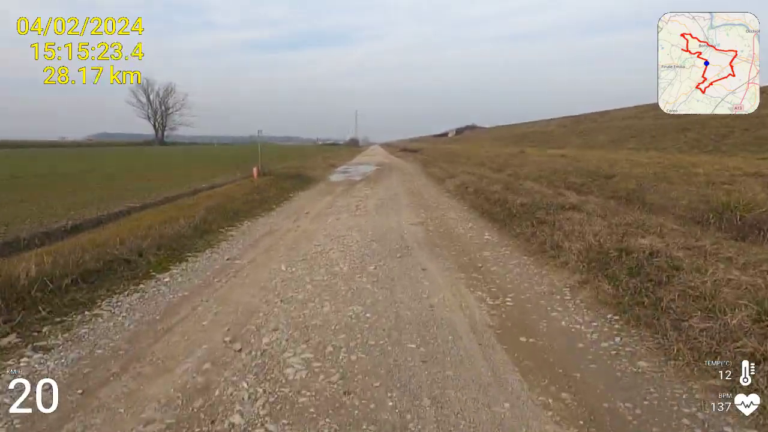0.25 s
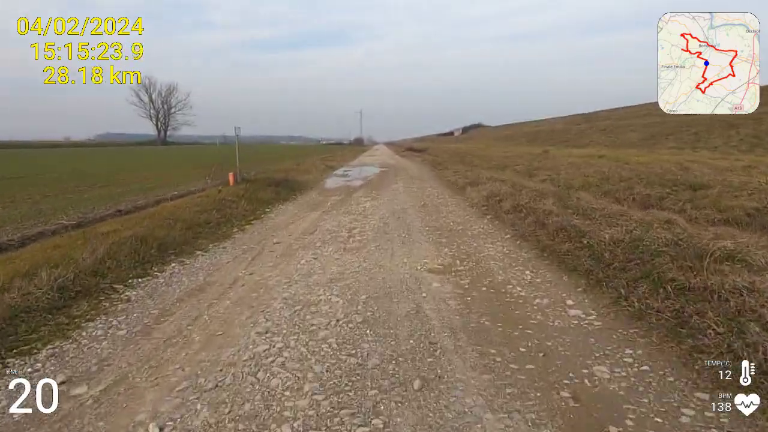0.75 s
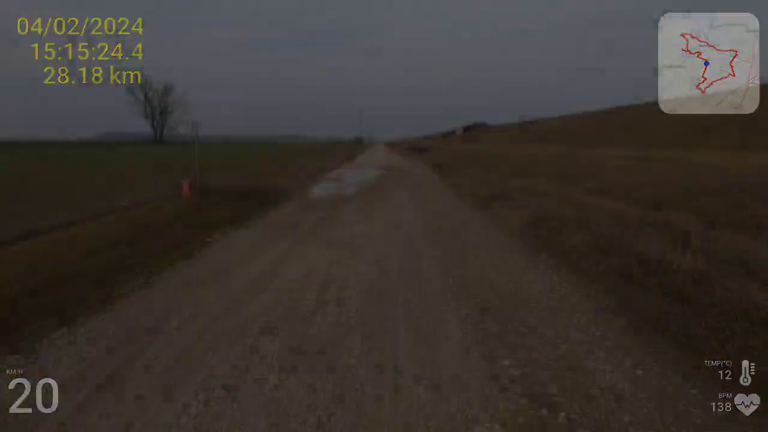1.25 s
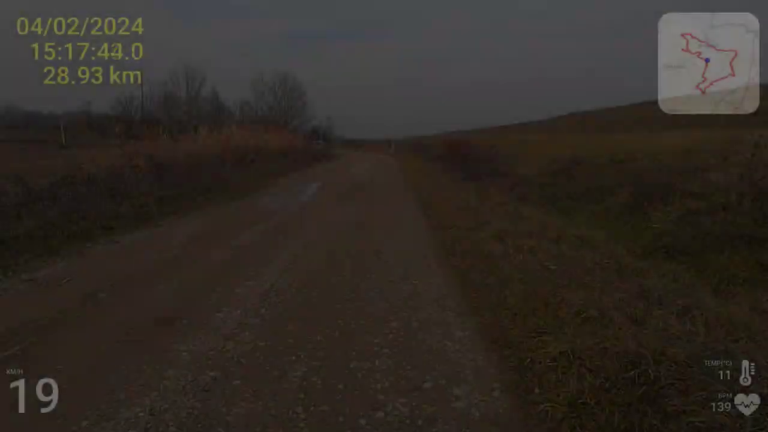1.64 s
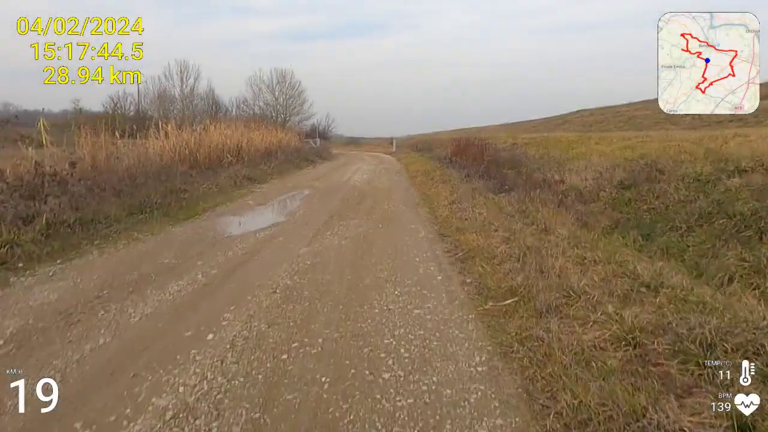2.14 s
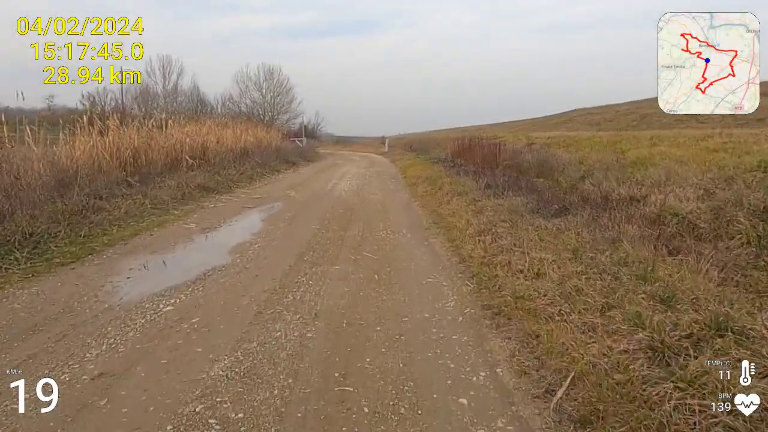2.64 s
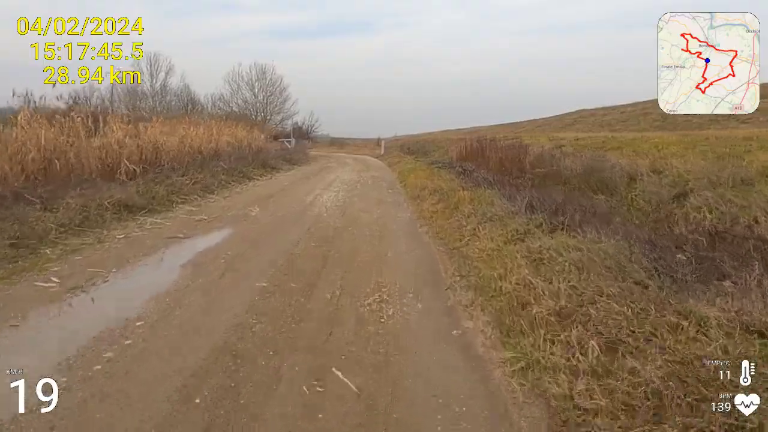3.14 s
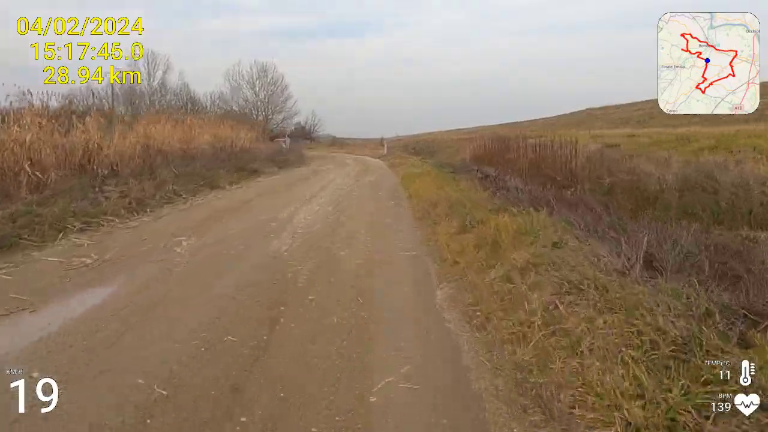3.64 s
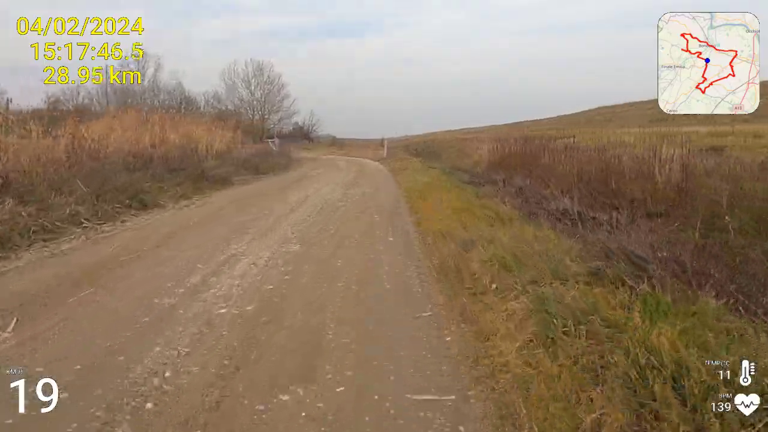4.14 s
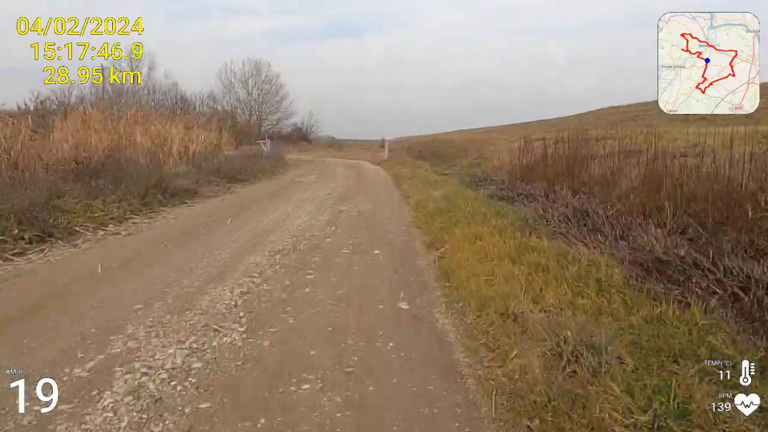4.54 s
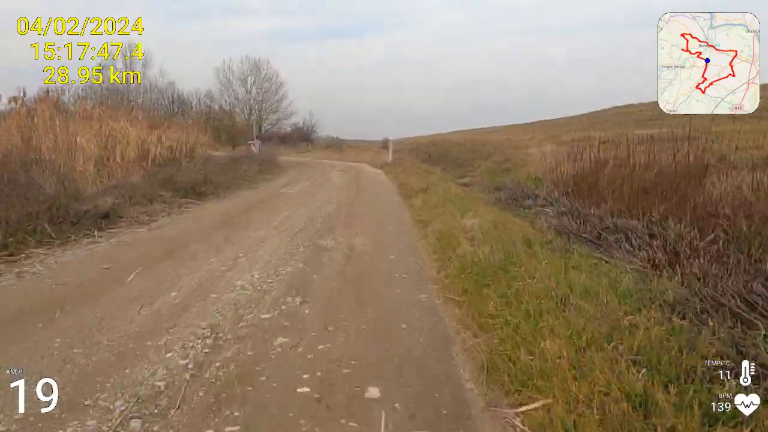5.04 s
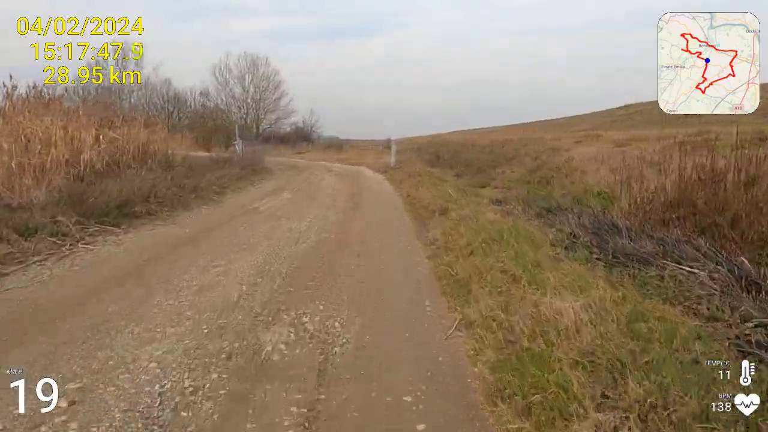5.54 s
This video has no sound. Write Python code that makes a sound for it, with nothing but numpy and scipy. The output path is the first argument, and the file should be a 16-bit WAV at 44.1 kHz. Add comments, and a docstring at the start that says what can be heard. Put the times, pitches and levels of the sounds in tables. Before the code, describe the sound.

A bicycle rolls over loose gravel, heard close from a camera riding on it, outdoors without echo. From 0 to 0.55 s, rapid jolts come around forty a second: hard rattling clatter, hollow mid-pitched stone knocks and dull frame thumps. They weaken until 0.75 s, leaving softer crunch and gritty crackle. Another rattling burst comes at 1.3-1.5 s, with one thin snap at 1.5 s, then more at 1.85-2.07 and 2.2-2.46 s. Short clatters follow at 2.8, 3.4-3.5 and 4.2 s, with calmer rolling between. The crunch thickens again around 5.05-5.4 s, with scattered stone knocks and a weak jolt near 5.25 s. Random pebble ticks and small dull bumps continue throughout. Low wind rumble fluctuates on the microphone, swelling with the shaking and dipping briefly, easing near the end. Faint high metallic pings sound at about 5.0, 5.13 and 5.4 s.

```python
"""Quick jolts rattle a bicycle on rough gravel while single stones knock, heard from a camera riding on it.
Tyres crunch throughout as random clicks and ringing pebbles; smoother ground parts the rough patches.
Jolts swell filtered noise into frame thumps and pebble clatter into rattle; small bumps thud in the frame.
Wind rumbles on the microphone as low noise in two bands; one thin snap comes early,
and late on a loose metal part, a tapped resonator, pings faintly."""
import sys
import numpy as np
from scipy import signal
from scipy.fft import rfft, irfft
from scipy.io import wavfile
from scipy.ndimage import uniform_filter1d

SR = 44100
rng = np.random.default_rng(int(sys.argv[2]) if len(sys.argv) > 2 else 0)


def to_wav(sig):
    """Store sig (one row per channel, or 1-D mono) as 16-bit WAV at the path in sys.argv[1].

    Samples outside -1..1 are clipped; the rate is SR.
    """
    pcm = np.clip(np.atleast_2d(sig), -1, 1) * 32767
    pcm = np.round(pcm).astype(np.int16)
    wavfile.write(sys.argv[1], SR, pcm.T)  # frames by channels


N = 254898
TIME = np.arange(N) / SR  # seconds

# The jolts of the rough patches, levels before the trim of each layer:
# start_s [centre of the swell, s], rattle_db [dB], spread_s [sigma of the swell, s],
# then relative to the rattle: knock_db [dB], treble_db [dB], thump_db [dB]
JOLTS = [(0.045, -29.5, 0.0052, 4.5, -9.5, 10), (0.062, -25, 0.0079, -2, -20, 3.5),
         (0.092, -27.5, 0.0068, 1, -17.5, -1), (0.11, -27.5, 0.0064, 5, -24, 5),
         (0.137, -28.5, 0.0055, 4, -17, 6), (0.157, -25, 0.0043, -6, -22, 5.5),
         (0.183, -26.5, 0.0061, 0, -18, 8), (0.201, -27, 0.0055, 3, -15.5, 6),
         (0.222, -24, 0.0041, -2, -17.5, 0.5), (0.239, -31, 0.0066, 0, -17, 7),
         (0.265, -26, 0.0039, -1, -13, 7), (0.286, -25, 0.005, -2, -20, 2),
         (0.314, -29, 0.0057, 2, -19, -6), (0.332, -26, 0.0046, 1, -21, 8),
         (0.354, -27.5, 0.004, 3, -25, 11), (0.368, -28.5, 0.0028, -3, -29, 9),
         (0.398, -27, 0.0044, 1, -17, 6), (0.416, -25.5, 0.0057, 1, -15, 5.5),
         (0.443, -26.5, 0.0052, -1, -15, 6), (0.466, -27, 0.0045, 2, -19, 7),
         (0.49, -30.5, 0.0052, 3, -14, 10), (0.515, -25.5, 0.0048, -3, -19, 6.5),
         (0.541, -27, 0.007, -5, -20.5, 5.5), (0.608, -37, 0.0082, 6.5, -19, 11.5),
         (0.653, -32.0, 0.0077, 2.5, -20, 7), (0.696, -34.5, 0.004, 5, -15, 10),
         (0.755, -34, 0.0096, 2, -21, 12), (1.287, -30.5, 0.007, 1.5, -23, 5),
         (1.307, -38, 0.0082, 4, -16, 13), (1.33, -26.5, 0.0065, 2, -12.5, 5),
         (1.356, -25.5, 0.0056, 5.5, -20, 3), (1.378, -29, 0.0058, 3, -30, 6),
         (1.392, -23.5, 0.0045, -6, -21, 0), (1.406, -26.5, 0.0053, -1, -24, 4.5),
         (1.434, -31, 0.0077, 0, -24, 10.5), (1.455, -43, 0.0083, 4, -18, 16),
         (1.474, -37.5, 0.0077, 2, -16, 7), (1.496, -41.5, 0.007, 7, -12, 12),
         (1.864, -27.9, 0.0042, -3, -14, 7), (1.89, -28, 0.0063, 2, -15, 8),
         (1.908, -27.5, 0.004, 2.5, -15, 3), (1.931, -28, 0.0042, 0, -17, 1),
         (1.953, -27.5, 0.0049, -1, -24, 0), (1.98, -28.5, 0.0055, 4.5, -17, 7),
         (2.002, -25.9, 0.0056, -2, -19, 0), (2.025, -30.5, 0.0053, 4.5, -16, 5.5),
         (2.042, -34, 0.0049, 4, -18, 4), (2.066, -29.5, 0.004, 1, -15, -1),
         (2.217, -30.5, 0.0046, 5.5, -15, 13.5), (2.236, -28.5, 0.0054, 2, -18, 8),
         (2.287, -35.9, 0.0053, 5, -20, 17), (2.31, -27, 0.0064, -1, -17.5, 10.5),
         (2.327, -29.5, 0.0047, -3, -27, 5), (2.352, -28.7, 0.0051, 3, -16, 4),
         (2.379, -26.6, 0.0061, 2, -20, 11), (2.405, -26, 0.0052, 3, -15.5, 10.5),
         (2.433, -28, 0.0037, 1, -18, 8), (2.457, -26, 0.0064, 0.5, -17.5, 6.5),
         (2.796, -28.5, 0.0042, -2, -14, 9.5), (2.812, -32.6, 0.0062, -5, -17, 13),
         (2.827, -29.5, 0.0086, -0.5, -19, 10.5), (3.378, -31, 0.0052, 0, -16.5, 12),
         (3.391, -34, 0.0044, 8.5, -18, 1), (3.403, -26, 0.0049, 3.5, -19, 8),
         (3.414, -24.7, 0.003, 0, -19, -12), (3.427, -28.5, 0.0049, -3, -19, 7),
         (3.45, -28, 0.0042, 3, -15, 6), (3.467, -34.5, 0.0064, 2, -22, 14),
         (3.525, -39, 0.0094, 2, -18, 17), (4.185, -33.5, 0.0064, 2, -21, 3),
         (4.197, -28, 0.0059, 1, -11.5, 6), (4.218, -26.4, 0.006, 1, -11.5, 8),
         (4.229, -32, 0.0048, 1, -22, -4), (4.242, -41, 0.0068, -6, -23, 16),
         (4.257, -32, 0.0033, 3, -16, 1), (4.272, -36.5, 0.0056, 7, -24, 12),
         (5.245, -39.8, 0.0047, 7.5, -15, 16), (5.267, -34.5, 0.0042, -4, -20, 9.5)]
# What the shaken bike rings with: pitch_hz [Hz], level_db [relative dB per Hz]
BODY = [(130, 2.5), (260, 8.5), (520, 3), (950, 0), (1350, 1.5), (1750, -4.5), (2100, -2), (2520, -2.5),
        (2800, -8.5), (3750, -9), (4400, -19), (8000, -26), (9300, -42.5), (12000, -51.5), (13500, -72),
        (16000, -89.5)]
TREBLE_BAND_HZ = (4200, 15000)


def tyres(gravel_db, grit_db):
    """Stones grind under the tread in clumps; fine grit crackles along with them and now and then spits."""
    # Tyre on coarse gravel: pitch_hz [Hz], level_db [relative dB per Hz]
    gravel_spectrum = [(150, -0.5), (350, 10.5), (650, 5.5), (1000, -0.5), (1400, 3.5), (1800, -2),
                       (2150, -0.5), (2550, -7), (3100, -33), (5000, -43.5)]
    # Tyre on fine grit: pitch_hz [Hz], level_db [relative dB per Hz]
    grit_spectrum = [(1500, -18.5), (2400, 0), (2900, 1.5), (3800, -1), (4700, -8), (5300, -12),
                     (7000, -16), (8200, -17), (9000, -30.5), (12500, -62), (16000, -89.5)]
    # Gain of the grit's treble: start_s [s], gain_db [dB]
    grit_treble = [(0, -6.5), (3.6, -0.5), (4.4, 3.5), (5.1, 5), (5.78, 4)]
    # Spits of sand flung off the tread: start_s [centre, s], level_db [dB]
    sand_spits = [(0.782, -50), (1.074, -46.5), (1.168, -42.5), (1.816, -40), (2.126, -38), (2.581, -46),
                  (2.727, -44.5), (2.887, -45)]
    spit_spread_s = 0.0098

    clumps = drift(rate=110)
    gravel_pebbles = pebbles(per_s=4500, spread_db=4.0, cycles=6.2, ring_db=-3.0)
    gravel = colour(gravel_pebbles, gravel_spectrum) * from_db(2.0 * clumps)
    grit_pebbles = pebbles(per_s=1700, spread_db=-0.5, cycles=7.5, ring_db=-6.5)
    grit = colour(grit_pebbles, grit_spectrum) * from_db(1.7 * clumps)

    treble_db, = in_time(grit_treble)
    highpass = signal.butter(2, 4800, "high", fs=SR, output="sos")
    grit = grit + (from_db(treble_db) - 1) * signal.sosfiltfilt(highpass, grit)

    spits = sum(from_db(db) * np.exp(-.5 * ((TIME - s) / spit_spread_s) ** 2) for s, db in sand_spits)
    gravel_gain = from_db(gravel_db + 3.0 + 1.4 * drift(rate=9))
    grit_gain = np.hypot(from_db(grit_db - 0.1), spits)
    return evened(gravel, even_s=0.071) * gravel_gain + evened(grit, even_s=0.24) * grit_gain


def bike():
    """Every jolt thumps the frame and lets loose parts knock, rattle and click, each in its own measure."""
    # The frame's thump: pitch_hz [Hz], level_db [relative dB per Hz]
    frame = [(50, -27.5), (100, -9.5), (150, 7), (240, 5), (380, -3.5), (560, -15), (1000, -61.5),
             (5000, -110)]
    _, rattle_db, _, knock_db, treble_db, thump_db = np.transpose(JOLTS)

    # colour_db lets the mix of pebble pitches wander from jolt to jolt
    clatter = pebbles(per_s=900, spread_db=2.0, cycles=8.0, ring_db=-2.0, colour_db=2.5)
    chatter = bent(colour(clatter, BODY))
    thump = evened(colour(rng.standard_normal(N), frame), even_s=0.011)
    out = from_db(-0.1) * jolt_force(rattle_db + thump_db) * thump

    layers = (((420, 1450), knock_db - 0.9),  # knock
              ((1450, 4200), -0.4),  # rattle
              (TREBLE_BAND_HZ, treble_db + 0.2))
    for band_hz, over_db in layers:
        bandpass = signal.butter(4, band_hz, "band", fs=SR, output="sos")
        part = signal.sosfiltfilt(bandpass, chatter)
        out = out + jolt_force(rattle_db + over_db) * evened(part, even_s=0.0083)
    return out


def jolt_force(levels_db):
    """Each jolt is a short swell of force; swells that overlap add in power."""
    reach_s = 1 / 43  # how far each side of its centre a swell is drawn
    force = np.zeros(N)
    for (s, _, spread_s, *_), db in zip(JOLTS, levels_db):
        near = slice(max(int((s - reach_s) * SR), 0), int((s + reach_s) * SR))
        swell = from_db(db) * np.exp(-.5 * ((TIME[near] - s) / spread_s) ** 2)
        force[near] = np.hypot(force[near], swell)
    return force


def stones(rows, settle_s, scatter_db, settle_clicks_per_s, ring_db, cycles):
    """A stone clicks hard, then settles in small clicks; it rings at its own pitch through the bike."""
    # What a stone rings with: multiple [times its pitch], level_db [dB]
    stone_modes = [(1, 2.5), (1.62, -16)]
    level_s = 0.0059  # time over which a stone's level is reckoned
    contact_hz, contact_follows = 13000, .5  # treble limit for a 1 kHz stone; power of pitch it follows

    out = np.zeros(N)
    age = np.arange(SR // 40) / SR
    click = 1. * (age == 0)
    fade = np.cos(np.pi / 2 * age / age[-1]) ** 2
    body = bent(colour(click, BODY)[:len(age)])
    treble = signal.butter(4, TREBLE_BAND_HZ[0], "high", fs=SR, output="sos")
    for s, db, hz, hard_db in rows:
        settling = rng.standard_normal(len(age)) * (rng.random(len(age)) < settle_clicks_per_s / SR)
        settling = settling * np.exp(-age / settle_s)
        contacts = click + from_db(scatter_db) * settling / (np.linalg.norm(settling) + 1e-9)

        # a big, low-pitched stone makes a longer, duller contact
        soft = np.exp(-2 * np.pi * contact_hz * (hz / 1000) ** contact_follows / SR)
        dulled = signal.lfilter([1 - soft], [1, -soft], contacts)
        rings = sum(from_db(mode_db) * ring(contacts, hz * multiple, cycles)
                    for multiple, mode_db in stone_modes)
        knock = signal.fftconvolve(dulled + from_db(ring_db) * rings, body)[:len(age)] * fade

        # a hard stone has more treble
        knock = knock + (from_db(hard_db) - 1) * signal.sosfiltfilt(treble, knock, padtype="constant")
        gain = from_db(db) * np.sqrt(level_s * SR / np.sum(knock ** 2))
        at = round(s * SR)
        out[at:at + len(age)] += gain * knock * rng.choice([-1, 1])
    return out


def small_stones(gravel_db):
    """Strays strike at random, about as hard as the gravel level: start_s, level_db, pitch_hz, treble_db."""
    per_s, spread_db, treble_db = 18, 3.5, 3
    low_hz, high_hz = 910, 2240
    rows = []
    for when, force, size in rng.random((round(per_s * N / SR), 3)):
        at = int(when * (N - SR // 30))
        db = gravel_db[at] + spread_db * (2 * force - 1)
        pitch_hz = high_hz * (low_hz / high_hz) ** size
        rows.append((at / SR, db, pitch_hz, treble_db))
    return rows


def bumps():
    """Small bumps come at uneven moments, each a dull thud in the frame."""
    # Thud in the frame: pitch_hz [Hz], level_db [relative dB per Hz]
    thud = [(50, -12.5), (105, 5), (150, -4), (215, -3), (300, -10.5), (400, -17), (580, -16.5), (800, -29),
            (1200, -58), (6000, -120)]
    return from_db(-32) * colour(grains(per_s=17, spread_db=-1.5), thud)


def snap():
    """A single thin click at 1.507 s, bright because a high-pass thins its lows."""
    click = from_db(-27) * (np.arange(N) == round(1.507 * SR))
    return signal.lfilter(*signal.butter(1, 3500, "high", fs=SR), click + 1e-18)


def pings():
    """A small loose metal part is tapped and rings on at one pitch."""
    # Taps on the part: start_s [s], level_db [dB]
    metal_taps = [(4.988, -38), (5.132, -41), (5.396, -45)]
    taps = np.zeros(N)
    for s, db in metal_taps:
        taps[round(s * SR)] = from_db(db)
    return ring(taps, hz=2480, cycles=170)


def wind(shaking):
    """Large eddies at the port rumble deep, small ones higher; gusts and the swaying camera raise both."""
    # Air on the microphone: start_s [s], deep_db [deep rumble, dB], upper_db [upper rumble, dB]
    gusts = [(0, -29, -17.5), (0.1, -18, -20.5), (0.43, -21.5, -24), (0.57, -23, -22.5), (0.72, -22, -21),
             (0.86, -22.5, -30), (1.12, -22.5, -28), (1.33, -21, -21.5), (1.56, -23, -27),
             (1.75, -20.5, -25), (1.92, -19.5, -23.5), (2.1, -24, -25.5), (2.38, -20, -23),
             (2.5, -23, -23.5), (2.78, -22, -26), (2.95, -22.5, -26.5), (3.1, -21.5, -27),
             (3.3, -20.5, -25), (3.48, -23.5, -20.5), (3.63, -19.5, -25.5), (3.8, -21, -26.5),
             (4.0, -22.5, -26.5), (4.14, -20, -23), (4.4, -22, -23.5), (4.53, -19, -26), (4.72, -21, -23),
             (4.86, -21, -23.5), (5.1, -22.5, -22), (5.3, -20, -23.5), (5.47, -20, -28.5), (5.58, -28, -29),
             (5.78, -24.5, -24)]
    # Moments when the wind drops briefly: start_s [centre, s]
    lulls = [0.0, 0.575, 0.81, 2.5, 2.87, 3.8, 4.43, 4.659, 4.97]
    # Wind on the microphone: pitch_hz [Hz], level_db [relative dB per Hz]
    wind_spectrum = [(10, -26), (22, 1), (40, 1), (70, -1), (115, -3.5), (160, -9.5), (220, -12.5),
                     (300, -21), (450, -28), (700, -33.5), (1200, -43), (3000, -87.5)]
    buffet_db = 2.5  # extra wind as the camera sways, relative to the shaking
    lull_depth_db, lull_spread_s = -5, 0.03
    split_hz = 87.6  # where the deep rumble hands over to the upper one

    deep_db, upper_db = in_time(gusts)
    lull_db = lull_depth_db * sum(np.exp(-.5 * ((TIME - s) / lull_spread_s) ** 2) for s in lulls)
    air = colour(rng.standard_normal(N), wind_spectrum)
    deep = signal.sosfiltfilt(signal.butter(4, split_hz, fs=SR, output="sos"), air)
    deep_gain = from_db(shaken(deep_db + lull_db, shaking, buffet_db))
    upper_gain = from_db(shaken(upper_db + lull_db, shaking, buffet_db))
    return deep_gain * evened(deep, even_s=0.089) + upper_gain * evened(air - deep, even_s=0.06)


def pebbles(per_s, spread_db, cycles, ring_db, colour_db=0, count=14):
    """Dry clicks plus pebbles ringing at many pitches, whose mix wanders by colour_db; rms 1."""
    rings = 0
    for hz in np.geomspace(500, 12000, count):
        ringing = rms_one(ring(grains(per_s / count, spread_db), hz, cycles))
        rings = rings + np.sqrt(hz) * ringing * from_db(colour_db * drift(rate=15))
    return rms_one(grains(per_s, spread_db) + from_db(ring_db) * rms_one(rings))


def grains(per_s, spread_db):
    """Contacts at random moments, of random strength and sign; rms 1."""
    sizes = from_db(spread_db * np.minimum(rng.exponential(1, N), 3))
    return rms_one(sizes * rng.choice([-1, 1], N) * (rng.random(N) < per_s / SR))


def ring(clicks, hz, cycles):
    """A unit click sets a sine of about height 1 ringing; it dies by 60 dB in so many cycles."""
    r = from_db(-60 * hz / (cycles * SR))
    w = 2 * np.pi * hz / SR
    resonator = [1, -2 * r * np.cos(w), r * r]
    return signal.lfilter([np.sin(w), -np.sin(w)], resonator, clicks + 1e-18) / (2 * np.sin(w / 2))


def bent(x):
    """The frame carries highs faster than lows, so a click arrives as a short wobbling knock."""
    # all-pass stages smear the blow around these pitches
    for hz in (600, 950, 1500, 2400):
        x = x - 2 * signal.lfilter(*signal.iirpeak(hz, 0.99, fs=SR), x)
    return x


def colour(x, spectrum, size=16384):
    """Causal (minimum-phase) filter with the given spectrum; white noise keeps its power."""
    hz, db = np.transpose(spectrum)
    bins = np.maximum(np.arange(size // 2 + 1) * SR / size, 1)
    cepstrum = irfft(np.log(from_db(np.interp(np.log(bins), np.log(hz), db))))
    # folding the cepstrum onto positive time gives minimum phase
    cepstrum[1:size // 2] *= 2
    cepstrum[size // 2 + 1:] = 0
    response = irfft(np.exp(rfft(cepstrum)))
    return signal.fftconvolve(x, response / np.linalg.norm(response))[:N]


def drift(rate):
    """Slow random wander of spread 1 that changes about `rate` times a second."""
    step = 40  # drawn once in so many samples, then interpolated
    r = np.exp(-2 * np.pi * rate * step / SR)
    noise = rng.standard_normal(N // step + 2002)
    slow = signal.lfilter([1], [1, -2 * r, r * r], noise)[2000:]
    return np.interp(np.arange(N) / step, np.arange(len(slow)), rms_one(slow))


def evened(x, even_s):
    """Hold the rms near 1 over stretches of even_s, leaving the faster detail."""
    power = uniform_filter1d(x ** 2, max(int(even_s * SR), 1))
    return x / np.sqrt(np.maximum(power, 1e-6))


def shaken(level_db, shaking, share_db):
    """A level in dB, raised in power by a share of the bike's shaking."""
    return 20 * np.log10(np.hypot(from_db(level_db), from_db(share_db) * shaking))


def in_time(rows):
    """Each column of a curve, at every sample."""
    s, *columns = np.transpose(rows)
    return [np.interp(TIME, s, c) for c in columns]


def from_db(db):
    """Decibels to gain."""
    return 10 ** (np.asarray(db) / 20)


def rms_one(x):
    """Scale to unit rms."""
    return x / np.sqrt(np.mean(x ** 2) + 1e-20)


def scene():
    """Tyres, bike and wind in the open air, with no echo; the jolts of the track drive all three."""
    # The rolling surface, before the tyres' trim: start_s [s], gravel_db [dB], grit_db [dB]
    roll = [(0, -44.5, -51), (0.7, -41.5, -47), (0.95, -49.5, -53), (1.2, -46, -48.5), (1.6, -45.5, -51),
            (2.1, -41, -49), (2.58, -42.5, -50), (2.95, -50, -50.5), (3.22, -46.5, -48), (3.66, -51, -54.5),
            (3.85, -51.5, -57), (4.1, -50.5, -55), (4.4, -46.5, -52.5), (4.62, -52.5, -54.5),
            (5.05, -42.5, -52), (5.3, -42, -51), (5.55, -52, -57), (5.78, -47, -55)]
    # The loudest single stones, before trim:
    # start_s [s], level_db [dB], pitch_hz [Hz], treble_db [treble gain, the hardness, dB]
    loud_stones = [(0.0592, -22, 1291, 1), (0.1358, -25, 2519, 3.5), (0.1561, -23.5, 2357, -6),
                   (0.181, -22.5, 1345, -6), (0.2225, -22, 2196, 0), (0.2868, -25, 2347, -8),
                   (0.3126, -23.5, 2260, 0), (0.3276, -25, 2508, -2), (0.4206, -21, 3402, 2),
                   (0.4437, -23, 1238, 0), (0.4625, -22.5, 2454, -7), (0.4916, -25, 2433, 1),
                   (0.5151, -24, 1518, -3), (0.6498, -32, 1399, -2), (0.6646, -31, 796, -1),
                   (0.6937, -31, 1195, 2), (0.7849, -35.5, 1830, -2), (0.8363, -33.4, 2433, -8),
                   (0.8627, -37, 1507, 1), (1.1653, -37, 2131, -11), (1.2211, -26.5, 721, -7),
                   (1.3563, -20.9, 2347, -13), (1.3904, -24, 2056, -1), (1.4047, -24.7, 2121, -4),
                   (1.5024, -24.5, 721, -8), (1.5486, -30.5, 721, 2), (1.5822, -38, 775, 1),
                   (1.6408, -33.5, 721, -8), (1.6637, -37, 721, -4), (1.7694, -33, 732, 1),
                   (1.8602, -24.5, 2314, 7.5), (1.8876, -23.5, 753, 2), (1.9319, -24, 1076, 0),
                   (1.9485, -25, 2476, -8), (1.9805, -22.5, 872, 4), (1.9979, -25.5, 2024, -5),
                   (2.0646, -32, 807, 1), (2.2081, -27.5, 2422, -3), (2.3099, -27.5, 1981, 1),
                   (2.3765, -25, 807, -4), (2.4049, -27, 2217, 0), (2.4287, -25.6, 2411, -5),
                   (2.7923, -26, 818, 1), (2.8277, -26, 2207, 1), (3.2126, -36, 721, -1),
                   (3.4138, -23, 2217, 3), (3.4504, -33, 2228, 3), (3.4706, -29, 904, -1),
                   (3.5017, -28.5, 721, -5), (3.5091, -30, 2304, -1), (3.5445, -31.5, 721, 0),
                   (3.742, -35, 721, 1), (4.1962, -29, 2034, 5), (4.2206, -25.5, 1421, -3),
                   (4.2749, -28.5, 1055, -10), (4.2931, -32.5, 2336, 1), (4.3137, -36.5, 872, -2),
                   (4.7263, -37.5, 721, -5), (4.7729, -33, 721, -8), (4.9347, -34, 1227, -10),
                   (5.0482, -27.5, 721, 0), (5.0684, -29.5, 785, 3), (5.0946, -34, 721, -8),
                   (5.195, -29.5, 764, -6), (5.2885, -39, 1442, -7), (5.3032, -32, 721, -4),
                   (5.3252, -25, 721, -11), (5.3438, -32.6, 1259, -6), (5.359, -26.5, 2217, -8)]
    sway_s = 0.091  # the shaking is the jolts' force averaged over this time

    shaking = uniform_filter1d(jolt_force(np.array(JOLTS)[:, 1]), max(int(sway_s * SR), 1))
    gravel_db, grit_db = in_time(roll)
    # the bouncing tyres dig in: extra crunch in proportion to the shaking
    gravel_db = shaken(gravel_db, shaking, share_db=-6.5)
    grit_db = shaken(grit_db, shaking, share_db=-15.5)
    knocks = stones(list(loud_stones) + small_stones(gravel_db), settle_s=0.0042, scatter_db=-4,
                    settle_clicks_per_s=2200, ring_db=-24.5, cycles=13.3)
    mix = tyres(gravel_db, grit_db) + wind(shaking) + bumps() + pings() + bike()
    return (mix + from_db(1.3) * knocks + snap())[None]


def record(dry):
    """The camera housing adds its resonances, peaks are rounded, the top is cut."""
    # Resonances of the housing: pitch_hz [Hz], width_hz [Hz], lift_db [dB]
    housing = [(1260, 40, -1), (2140, 59, 3), (2406, 36, 4), (3900, 130, -1.5), (6850, 230, 2)]
    heard = dry
    for hz, width_hz, db in housing:
        peak = signal.lfilter(*signal.iirpeak(hz, hz / width_hz, fs=SR), dry)
        heard = heard + (from_db(db) - 1) * peak
    top = 0.8  # ceiling of the rounding
    rounded = top * np.tanh(heard / top)
    # 70 dB down from 16 kHz up
    return signal.sosfilt(signal.cheby2(12, 70, 16000, fs=SR, output="sos"), rounded)


dry = scene()
out = record(dry)
to_wav(out)
```